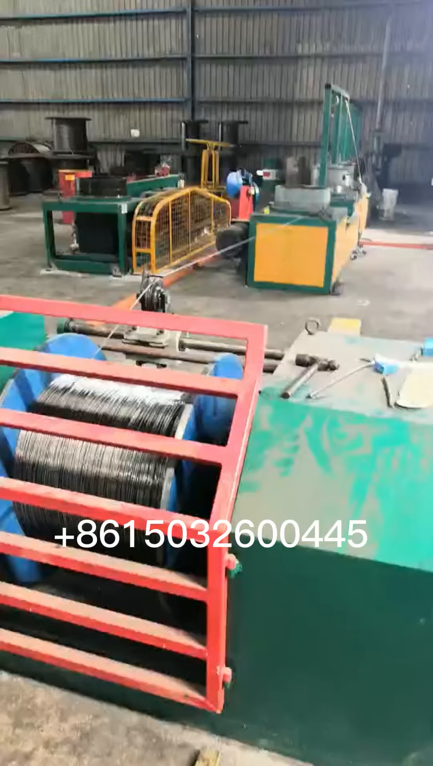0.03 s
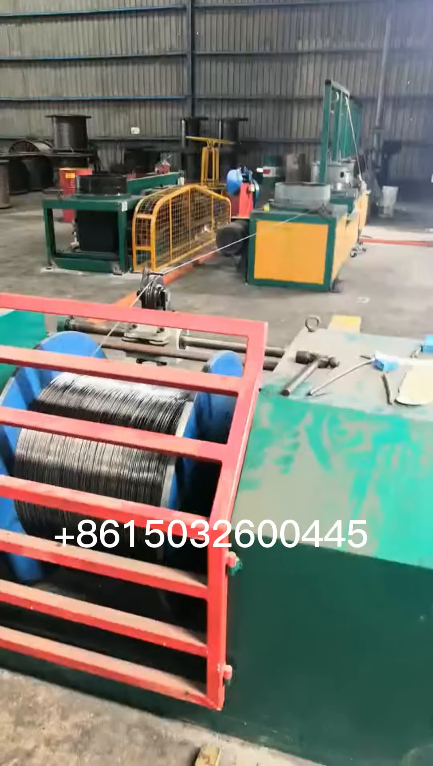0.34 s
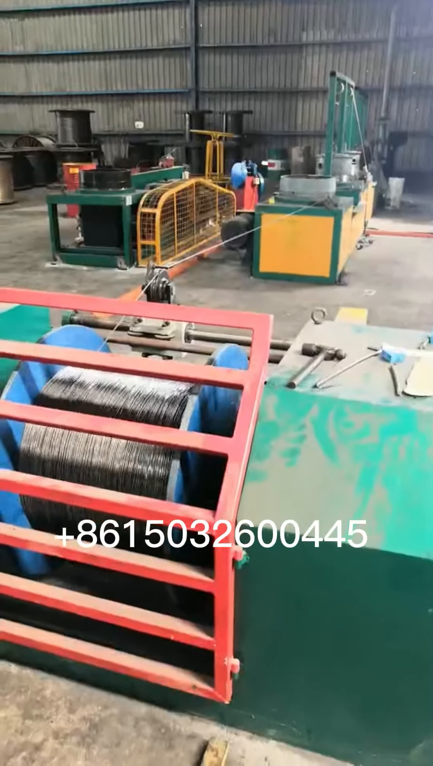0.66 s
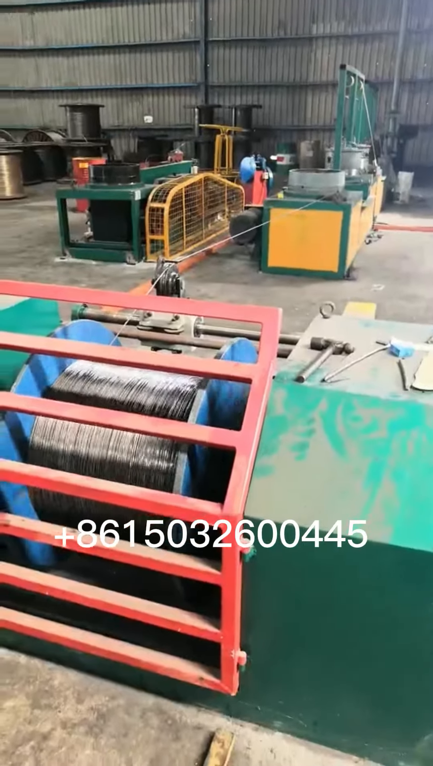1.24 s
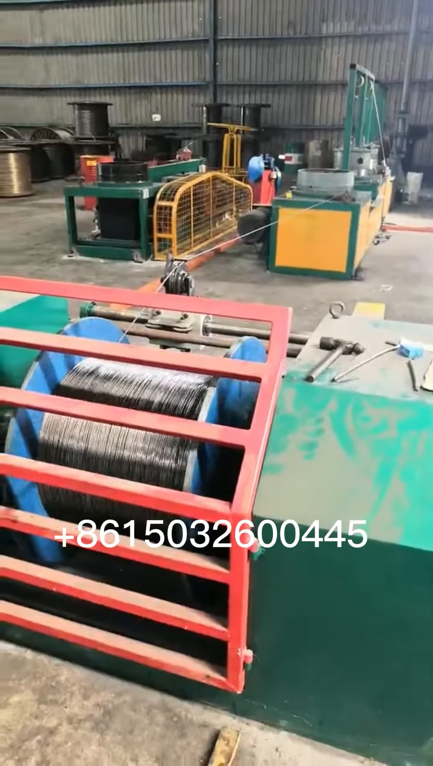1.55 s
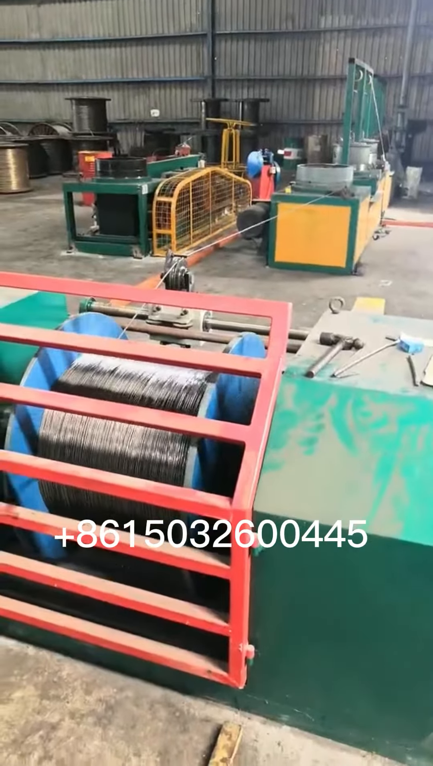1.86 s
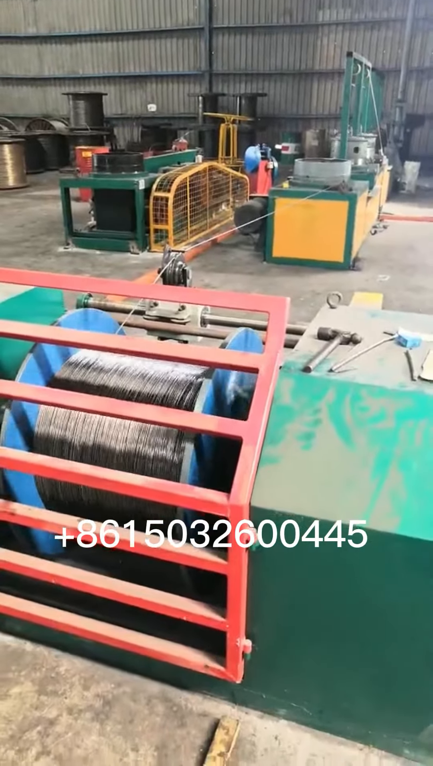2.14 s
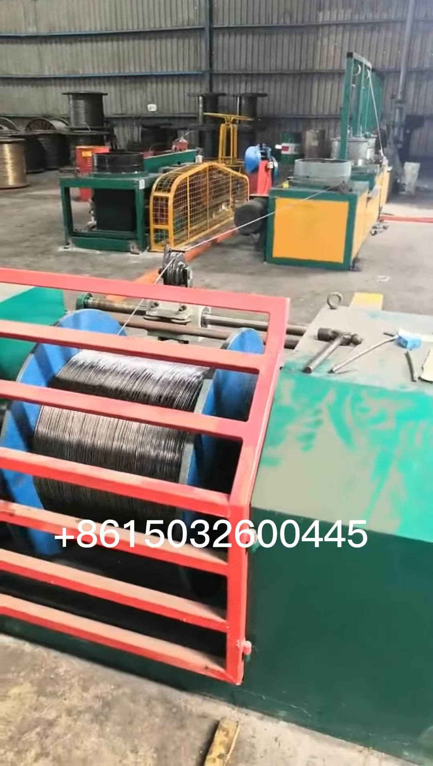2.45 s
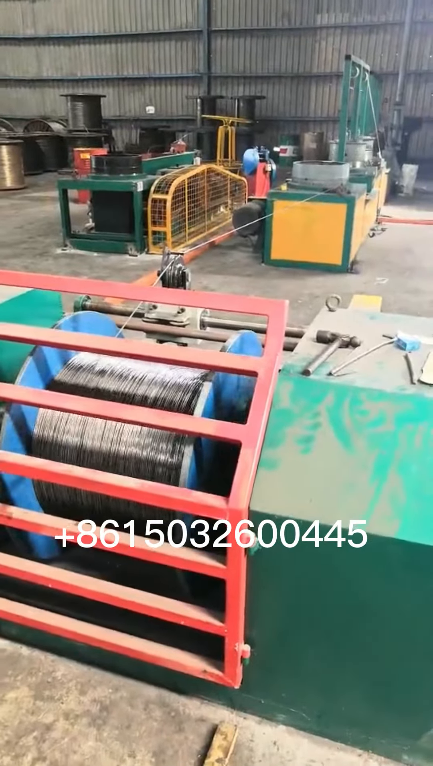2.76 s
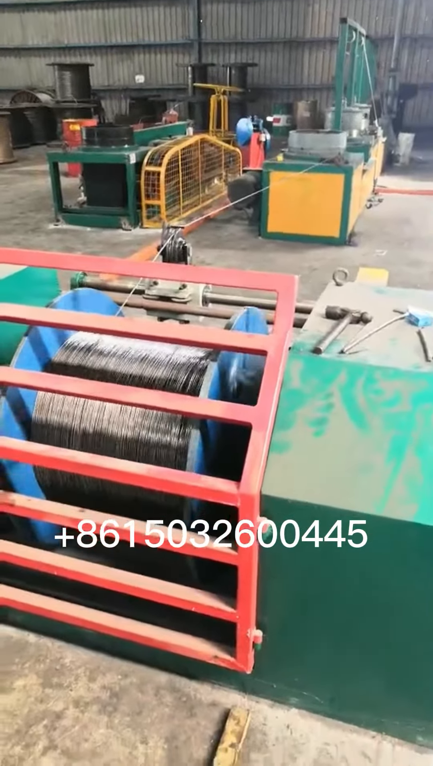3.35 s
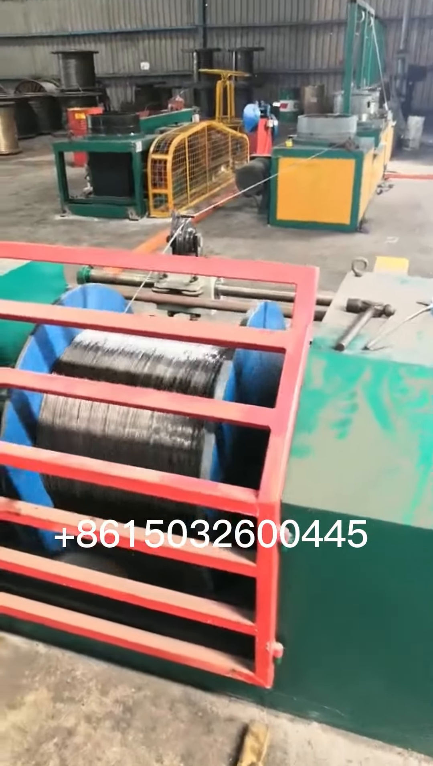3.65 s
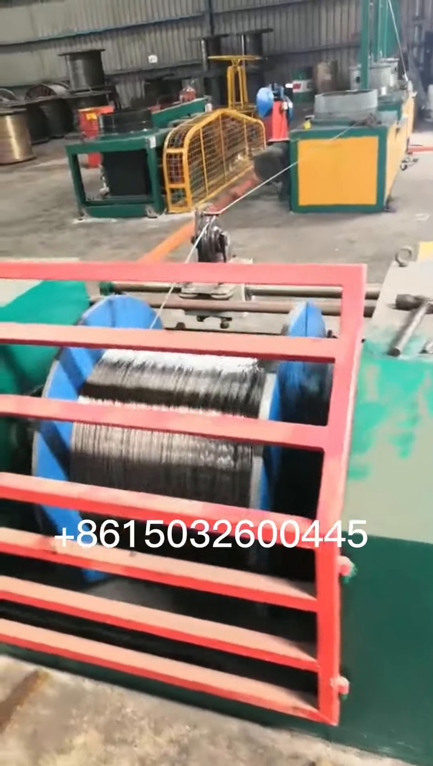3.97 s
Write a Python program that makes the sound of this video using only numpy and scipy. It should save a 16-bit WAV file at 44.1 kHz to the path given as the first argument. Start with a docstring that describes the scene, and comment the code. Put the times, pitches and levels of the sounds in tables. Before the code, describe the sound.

In a workshop hall, a wire winding machine drones nearby with a high-pitched motor whine. Running wire hisses and rattles throughout, scraping softly and now and then snapping into place on the reel with a clack.

```python
"""Wire drawing and reeling machine

The machine runs steadily in a metal-walled workshop; the sound cuts in after a third of a second.
The reel rumbles and its housing booms, gears and motors hum, and the drive whines in sidebands of
its switching rate. Wire rubs and rattles through resonant guides, scrapes onto the spool, and now
and then a turn snaps into place with a clack."""
import sys
import numpy as np
from scipy import signal
from scipy.fft import rfft, irfft
from scipy.io import wavfile

SR = 44100
rng = np.random.default_rng(int(sys.argv[2]) if len(sys.argv) > 2 else 0)


def int16_out(signal):
    """Quantize to a 16-bit WAV file."""
    q = np.round(np.clip(np.atleast_2d(signal).T, -1, 1) * 32767)
    wavfile.write(sys.argv[1], SR, q.astype(np.int16))


N = 176400
T = np.arange(N) / SR
HZ = np.maximum(np.arange(N // 2 + 1) * SR / N, 1)

# course of the reel's rumble and of its gears: (time [s], relative level [dB])
REEL_LEVEL = [(.35, -5), (.52, -1), (.7, -0.5), (1.75, 0), (1.95, -2), (2.15, .5), (2.7, 1), (3.3, 0.5),
              (4, -1.5)]


def from_db(db):
    """Amplitude ratio: tenfold for every 20 dB."""
    return 10 ** (np.asarray(db) / 20)


def unit_rms(x):
    """Normalisation to unit mean power."""
    return x / np.sqrt(np.mean(x ** 2) + 1e-20)


def envelope(levels):
    """Amplitude envelope of a level curve, taken about its mean in decibels."""
    db = np.interp(T, *np.transpose(levels))
    return from_db(db - db.mean())


def at_hz(points):
    """Interpolation along logarithmic frequency."""
    hz, value = np.transpose(points)
    return np.interp(np.log(HZ), np.log(hz), value)


def pan(db):
    """Constant-power law: left and right gains for a level difference."""
    gains = from_db(np.array([[.5], [-.5]]) * db)
    return gains / np.sqrt(np.mean(gains ** 2, axis=0))


def slow_noise(corner_hz, size):
    """Low-pass noise of unit power on a coarse grid."""
    hz = np.arange(size // 2 + 1) * SR / N
    return unit_rms(irfft(rfft(rng.standard_normal(size)) / (1 + (hz / corner_hz) ** 2), size))


def drift(corner_hz, size=4096):
    """Slow random modulation, interpolated to every sample."""
    return np.interp(T, np.linspace(0, N / SR, size), slow_noise(corner_hz, size))


def colour(x, spectrum):
    """Spectral shaping, normalised to unit power."""
    return unit_rms(irfft(rfft(x) * from_db(at_hz(spectrum)), N))


def hall_noise(spectrum):
    """Diffuse field: noise at two points is coherent in the bass and nearly independent above."""
    # likeness of the channels: (frequency [Hz], coherence [0-1])
    likeness = [(60, .99), (170, 1), (260, 0.85), (430, 0.12), (550, 0.36), (1000, 0.12), (2500, 0.16),
                (8000, 0.04), (14000, 0.089)]
    # level difference: (frequency [Hz], left minus right [dB])
    balance = [(200, 0), (330, -1.5), (650, 3.5), (1000, -1), (1900, -0.5), (2700, -5.5), (4000, -2),
               (4700, -3), (6200, -0.5), (7800, 1), (9500, 7.5), (12000, 1), (15000, 2)]
    # phase difference: (frequency [Hz], left lead [rad])
    lead = [(350, 0), (550, 3), (1000, 2), (1300, 0), (2400, -3), (3600, -2.5), (5000, 1.5)]
    common, independent = rfft(rng.standard_normal((2, N)))
    coherence = np.clip(at_hz(likeness), 0, .999)
    left = common * np.exp(1j * at_hz(lead))
    right = coherence * common + np.sqrt(1 - coherence ** 2) * independent
    return colour(irfft(np.array([left, right]) * pan(at_hz(balance)), N), spectrum)


def hall_tones(lines, scatter=.3, waver_hz=6, size=2048):
    """Interference: each direct tone adds to reflections that vary along the microphone's path."""
    # almost still, then moving through the standing waves: (time [s], relative speed [ratio])
    mic_speed = [(.35, 0.608), (1.1, .3), (2.7, .3), (3.1, 1.63), (4, 1.813)]
    travel = np.cumsum(np.interp(T, *np.transpose(mic_speed)))
    path = np.linspace(0, travel[-1], size)
    out = np.zeros((2, N))
    for hz, db, pan_db, lead in lines:
        carrier = np.exp(2j * np.pi * (hz * T + rng.random()))
        gains = from_db(db) * pan(pan_db) / np.sqrt(.5 + scatter ** 2)
        for side, direct in enumerate((np.exp(1j * lead), 1)):
            reflected = slow_noise(waver_hz, size) + 1j * slow_noise(waver_hz, size)
            field = gains[side] * (direct + scatter * reflected)
            out[side] += (np.interp(travel, path, field) * carrier).real
    return out


def reel(rumble_db=-38.5, throb_hz=13.5, throb_depth=.25):
    """Amplitude modulation: the turning shaft makes the rumble throb, over a deep drone."""
    # spectrum of the rumble: (frequency [Hz], relative density [dB])
    rumble_spectrum = [(20, -26), (35, -17), (60, -16.5), (100, -6), (140, 1.5), (230, 1.5), (280, -2.5),
                       (350, -3), (430, -10), (600, -16), (1200, -49)]
    # spectrum of the drone: (frequency [Hz], relative density [dB])
    drone_spectrum = [(20, -18), (32, -5), (52, 3), (72, -1), (105, 1), (135, -0.5), (220, -44.5)]
    # course of the drone: (time [s], level [dB])
    drone_level = [(.35, -42), (1.5, -42.5), (2.2, -42.5), (2.8, -45.5), (3.3, -40.5), (3.85, -39.5),
                   (4, -34.5)]
    throb = 1 + throb_depth * np.sin(2 * np.pi * (throb_hz * T + rng.random()))
    drone = from_db(np.interp(T, *np.transpose(drone_level))) * hall_noise(drone_spectrum)
    rumble = unit_rms(throb * hall_noise(rumble_spectrum))
    return from_db(rumble_db) * envelope(REEL_LEVEL) * rumble + drone


def housing_booms(length_s=.055):
    """Resonance: the reel's housing booms in short swells, each at one low frequency."""
    # booms: (time [s], frequency [Hz], level [dB])
    booms = [(.66, 225, -36), (1.06, 229, -36), (1.21, 167, -30.5), (1.69, 180, -34), (3.12, 222, -37),
             (3.6, 141, -39), (3.9, 174, -38)]
    out = np.zeros(N)
    for s, hz, db in booms:
        swell = from_db(db) * np.exp(-(2 * (T - s) / length_s) ** 2)
        out += swell * np.sqrt(2) * np.sin(2 * np.pi * (hz * T + rng.random()))
    return out


def gears_and_motors(gear_gain_db=-1, gears_below_hz=265):
    """Periodic vibration gives a line spectrum: low gear tones, with the motors' hum above them."""
    # partials: (frequency [Hz], relative level [dB], left minus right [dB], left lead [rad])
    lines = [(140, -50.5, 0, 0.1), (166, -49, 0, 0.1), (182, -51, 0, 0.2), (190, -50, 0, 0.1),
             (210, -48, 0, 0.0), (223, -49, 0, 0), (228, -48, 0, -0.1), (267, -52, 0, 0),
             (300, -41, -2, -0.3), (309.3, -50.5, -2, 0), (314, -52, -2, 0.3), (319, -45.5, -4, 0.7),
             (358, -56, -3, 0.5), (377, -55, -3, -1.1), (472, -54, 0, 2.6), (487, -59, 0, 2.6),
             (533, -56, 1, 3.0), (599, -56, 1, -2.9)]
    # course of the hum: (time [s], relative level [dB])
    hum_level = [(.35, 0), (.39, 10.5), (.45, 2.5), (.54, 5.5), (.63, 1.5), (.68, 5.5), (.78, 3.5),
                 (1.4, 3), (1.9, -1), (2.4, 0.5), (2.8, -1.5), (4, -1)]
    gears = hall_tones([row for row in lines if row[0] < gears_below_hz])
    hum = hall_tones([row for row in lines if row[0] >= gears_below_hz])
    return from_db(gear_gain_db) * envelope(REEL_LEVEL) * gears + envelope(hum_level) * hum


def drive_whine(gain_db=.8, split_hz=4280, scatter=.45, waver_hz=3.6):
    """Modulation sidebands cluster round the speed control's switching rate and its double."""
    # sidebands: (frequency [Hz], relative level [dB], left minus right [dB], left lead [rad])
    sidebands = [(3675, -58, -4, -2.3), (3793, -56, -4, -2.5), (3818, -49.5, -5, -2.7),
                 (3871, -48, -11, -2.7), (3877, -55, -6, -2.7), (3902, -51, -6, -0.9), (3931, -55, -3, 2.7),
                 (3959, -47.5, -4, -3.1), (3985, -56, -4, 3), (4017, -54, -5, 2.9), (4042, -45, -6, 2.3),
                 (4066, -52, 0, -1.6), (4099, -46, -9, 2.4), (4128, -55, -4, 2.5), (4183, -49, -4, 0.5),
                 (4206, -55, -4, 2.6), (4266, -55, -3, 0), (4348, -55, -3, -1.3), (4356, -49.5, -1, -0.7),
                 (4373, -56, -1, 0.2), (4403, -45, 0, -0.4), (4414, -52.5, -1, -1.0), (4424, -52, -2, -0.3),
                 (4470.5, -48, -3, -3.0), (4474.5, -52, -4, -1), (4526, -50, -6, 1.4), (4530.5, -49, -6, 0),
                 (4535, -54, -4, 0), (4577, -49.5, 0, 0.2), (4587, -51, -1, -2.5), (4592, -55, -2, 0),
                 (4599, -51, -3, -1.6), (4628, -53, -3, -1.7), (4653, -54, -8, -3.1),
                 (4935, -57.5, -2, -0.4), (4957, -60, -6, -2.6), (7860, -65, 3, -0.2), (7974, -56, 0, -0.8),
                 (8000, -61, 0, -0.0), (8008, -63, 7, -1.7), (8028, -61, -1, -1.8)]
    # course of the lines below the split: (time [s], relative level [dB])
    lower_level = [(.35, 0.5), (.48, 3), (.56, 6), (.66, 5.5), (.82, 1), (1, -4.5), (1.25, -1), (1.85, 0),
                   (2.4, 1.5), (3, 2), (3.3, 2.5), (3.53, 1.5), (3.66, 3), (3.77, -1.5), (3.95, 2.7)]
    # course of the lines above it: (time [s], relative level [dB])
    upper_level = [(.35, 1), (.48, 4.5), (.7, 0), (1.8, -.3), (2.55, -.5), (2.64, 2), (2.85, -.5),
                   (3.33, -2), (3.41, 1.5), (3.52, -.8), (3.69, 1), (3.76, -1), (3.85, 3), (4, -1.5)]
    lower = hall_tones([row for row in sidebands if row[0] < split_hz], scatter, waver_hz)
    upper = hall_tones([row for row in sidebands if row[0] >= split_hz], scatter, waver_hz)
    return from_db(gain_db) * (envelope(lower_level) * lower + envelope(upper_level) * upper)


def wire_rub(level_db=-33.5, flutter_db=.72, flutter_hz=5.7):
    """Sliding friction: wire in the guides gives broadband noise that flutters slightly."""
    # rubbing and the hall's wash: (frequency [Hz], relative density [dB])
    spectrum = [(200, -9), (500, -2.5), (750, -2.5), (1300, -3.5), (1900, -1), (2700, -0.5), (3350, -7),
                (3900, -2), (4700, -2.5), (5300, -6.5), (6300, -13.5), (7900, -12.5), (9200, -13),
                (10800, -29), (13000, -31), (15000, -51)]
    # course of the rubbing: (time [s], relative level [dB])
    level = [(.35, -0.5), (.7, -2), (1, -1), (1.6, 0.1), (2.4, -0.5), (3.1, -0.5), (3.45, 0.9), (4, -1)]
    return envelope(level) * from_db(level_db + flutter_db * drift(flutter_hz)) * hall_noise(spectrum)


def guide_ringing(contacts):
    """Modal response: each contact excites every damped mode of the guides with a random strength."""
    # modes: (frequency [Hz], bandwidth [Hz], relative level [dB])
    modes = [(1202, 15, -0.5), (1292, 28, -4), (1375, 7.8, -9), (1850, 17, -0.5), (1960, 40, -7),
             (2410, 37, -0.5), (2830, 140, -1)]
    out = np.zeros((2, N))
    for hz, bandwidth, db in modes:
        radius = np.exp(-np.pi * bandwidth / SR)
        feedback = [1, -2 * radius * np.cos(2 * np.pi * hz / SR), radius ** 2]
        force = (contacts + 1e-9) * rng.standard_normal((2, N))
        out += from_db(db) * unit_rms(signal.lfilter([1, 0, -1], feedback, force))
    return unit_rms(out)


def guide_rattle(contacts_per_s=90, spread_db=1, t60_s=.061, noise_db=-46, ring_db=-46):
    """Poisson impacts: many small contacts add decaying bursts of noise and ring the guides."""
    # spectrum of the bursts: (frequency [Hz], relative density [dB])
    spectrum = [(400, -7.5), (800, 4.5), (1200, 1), (1900, 2.5), (2700, 1.5), (3400, -8.5), (5000, -6),
                (6500, -31), (9000, -19), (11000, -32), (15000, -42)]
    # course of the rattling: (time [s], relative level [dB])
    level = [(.35, 0), (.7, 0.5), (.88, 5), (1.12, 4), (1.22, -5), (1.35, 5.5), (1.55, -3), (2, 3.5),
             (2.8, 0.5), (3.2, -1), (3.45, 2), (3.7, -5.5), (4, 4.5)]
    struck = rng.random(N) < contacts_per_s / SR
    contacts = struck * from_db(spread_db * np.minimum(rng.exponential(1, N), 3))
    power_decay = 1e-6 ** (1 / (t60_s * SR))
    power = signal.lfilter([1], [1, -power_decay], contacts ** 2 + 1e-12)
    bursts = unit_rms(np.sqrt(power) * hall_noise(spectrum))
    return envelope(level) * (from_db(noise_db) * bursts + from_db(ring_db) * guide_ringing(contacts))


def guide_taps(mean_level_db=-54):
    """Impulse response: a short run of harder taps of the wire leaves the guides ringing."""
    # taps: (time [s], relative level [dB])
    taps = [(.862, 1), (.905, -1), (.936, 2), (.969, -1), (1.016, -6), (1.089, 3), (1.133, -1)]
    s, db = np.transpose(taps)
    contacts = np.zeros(N)
    contacts[(s * SR).astype(int)] = from_db(db)
    return from_db(mean_level_db) * guide_ringing(contacts)


def spool_scrapes(grain_db=3, grain_hz=70, pan_db=3):
    """Friction noise: turns of wire slide against their neighbours in soft, gritty swells of hiss."""
    # scrapes: (time [s], duration [s], level [dB])
    scrapes = [(1.52, 0.14, -48), (1.797, 0.52, -51.5), (2.035, 0.1, -48), (3.2, .2, -50),
               (3.75, 0.22, -60)]
    # spectrum of the hiss: (frequency [Hz], relative density [dB])
    spectrum = [(3000, -22), (6000, 1), (9000, 4), (11000, -6), (14000, -15), (16000, -20)]
    swell = sum(from_db(db) * np.exp(-(2 * (T - s) / length) ** 2) for s, length, db in scrapes)
    grit = unit_rms(from_db(grain_db * drift(grain_hz)))
    return pan(pan_db) * swell * grit * colour(rng.standard_normal((2, N)), spectrum)


def impact_decay(onset_s, t60_s, attack_s=.0002, hall_t60_s=.3, hall_db=-21):
    """Exponential decay after a quick rise, summed in power with the hall's faint reverberation."""
    age = np.maximum(T - onset_s, 0)
    direct = np.exp(-np.log(1000) * age / t60_s)
    tail = from_db(hall_db) * np.exp(-np.log(1000) * age / hall_t60_s)
    return (1 - np.exp(-age / attack_s)) * np.hypot(direct, tail)


def spool_clacks(snap_t60_s=.024, knock_t60_s=.12, rebound_s=.0015, second_s=.0085, second_db=-4):
    """Impact and rebound: the wire snaps into place and the spool answers with a duller double knock."""
    # clacks: (time [s], snap level [dB], rebound level [dB], knock level [dB], left minus right [dB])
    clacks = [(0.4577, -37, -33, -30.5, 0), (1.4865, -46, -46, -44, 2), (2.0013, -20.5, -25, -26.5, 4),
              (2.7588, -39, -24.5, -34.5, 11), (3.4795, -27, -22, -29.5, 4), (3.983, -25, -22, -29.5, -1)]
    # spectrum of the wire's snap: (frequency [Hz], relative density [dB])
    snap_spectrum = [(1000, -16), (3000, -1), (5500, 3), (8500, 2), (11000, -11), (15000, -15)]
    # spectrum of the spool's knock: (frequency [Hz], relative density [dB])
    knock_spectrum = [(400, -43), (1000, 0), (1600, 1.5), (2600, 5), (3500, -3.5), (6000, -26),
                      (12000, -19)]
    snap_noise = colour(rng.standard_normal((2, N)), snap_spectrum)
    knock_noise = colour(rng.standard_normal((2, N)), knock_spectrum)
    out = np.zeros((2, N))
    for s, snap_db, rebound_db, knock_db, pan_db in clacks:
        snap = from_db(snap_db) * impact_decay(s, snap_t60_s)
        rebound = from_db(rebound_db) * impact_decay(s + rebound_s, snap_t60_s)
        out += pan(pan_db) * np.hypot(snap, rebound) * snap_noise
        first_knock = impact_decay(s, knock_t60_s)
        second_knock = from_db(second_db) * impact_decay(s + second_s, knock_t60_s)
        out += from_db(knock_db) * np.hypot(first_knock, second_knock) * knock_noise
    return out


def scene():
    """Superposition: the sound pressures of the machinery and of the running wire add."""
    machinery = gears_and_motors() + drive_whine() + reel() + housing_booms()
    return machinery + wire_rub() + guide_rattle() + guide_taps() + spool_scrapes() + spool_clacks()


def record(dry, start_s=.3401, fade_s=.003, faint_db=-56, bass_hz=60, cutoff_hz=15900):
    """Gating and band limiting: the sound cuts in over a very faint bass, and the top treble is cut."""
    gate = np.clip((T - start_s) / fade_s, 0, 1)
    bass = signal.sosfilt(signal.butter(2, bass_hz, fs=SR, output="sos"), dry)
    low_pass = signal.cheby2(14, 70, cutoff_hz, fs=SR, output="sos")
    return signal.sosfilt(low_pass, gate * dry + from_db(faint_db) * bass)


dry = scene()
out = record(dry)
int16_out(out)
```